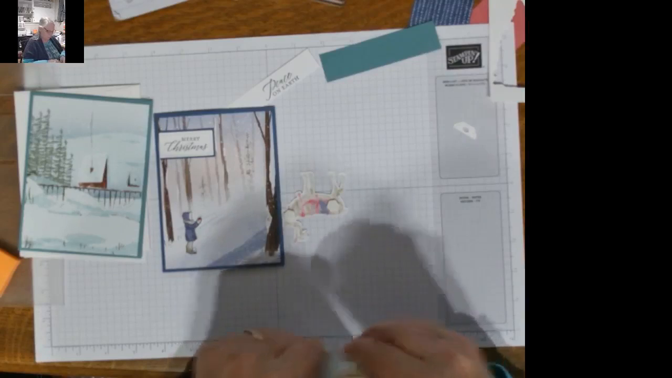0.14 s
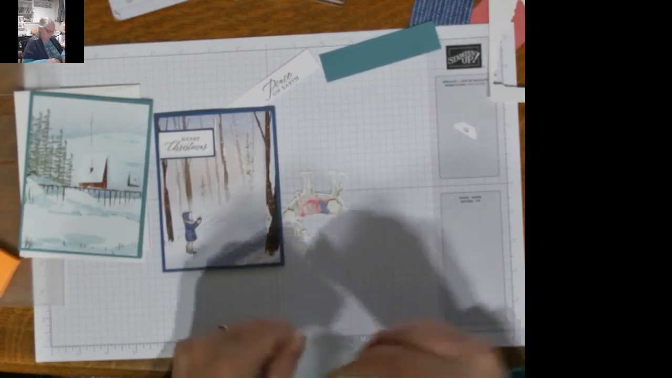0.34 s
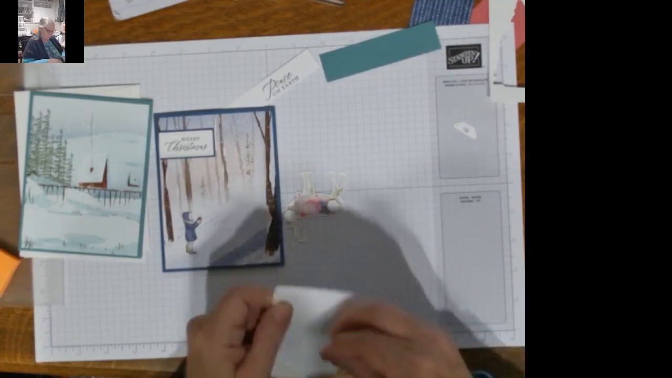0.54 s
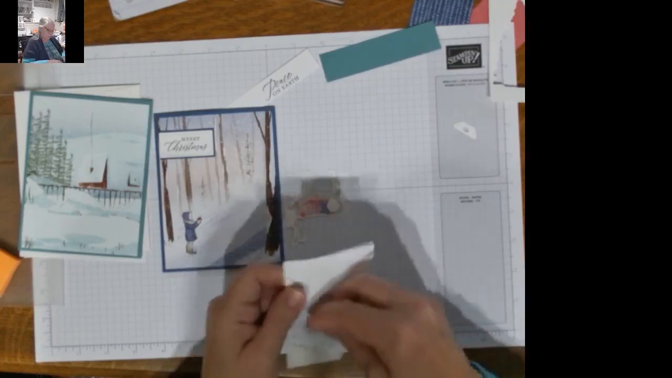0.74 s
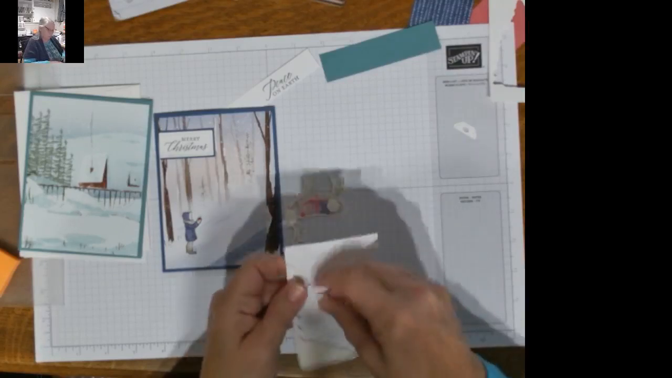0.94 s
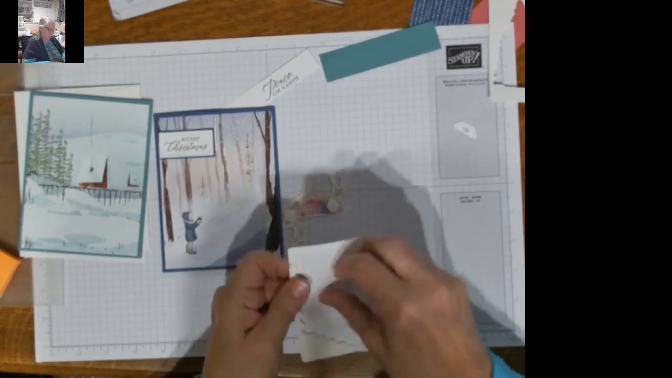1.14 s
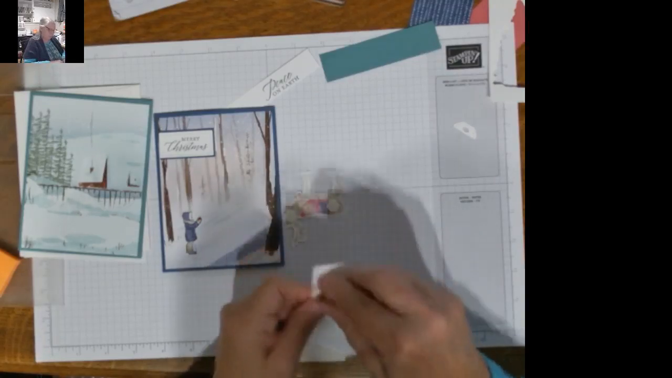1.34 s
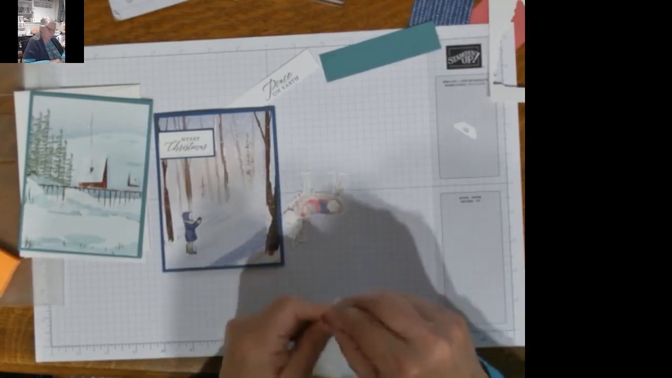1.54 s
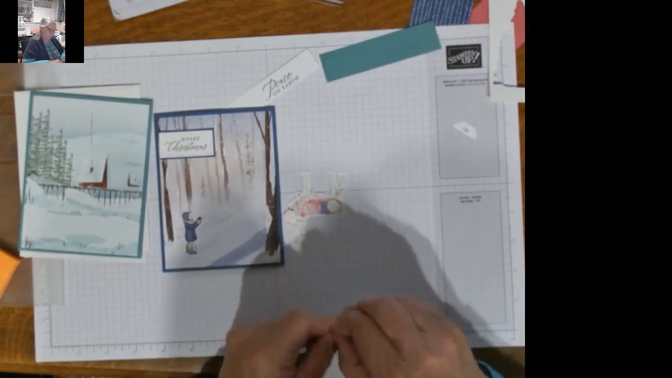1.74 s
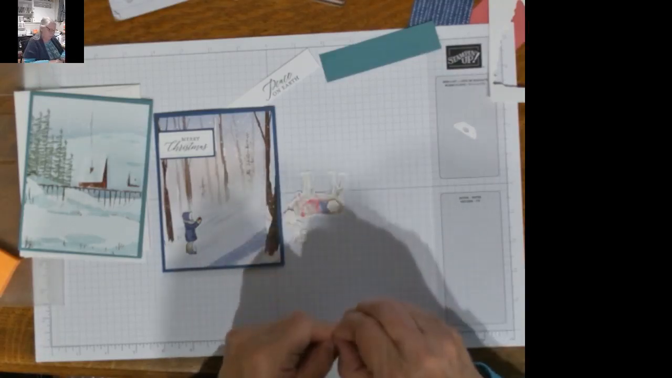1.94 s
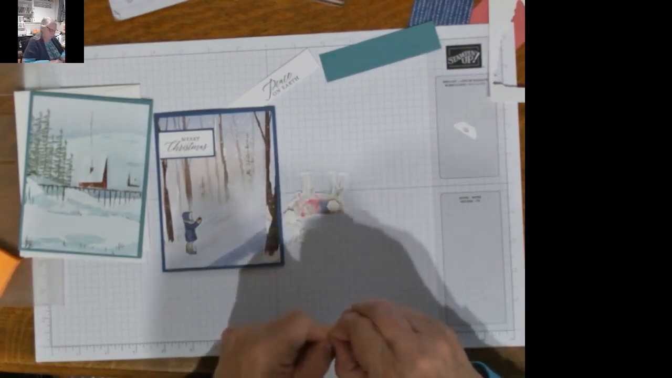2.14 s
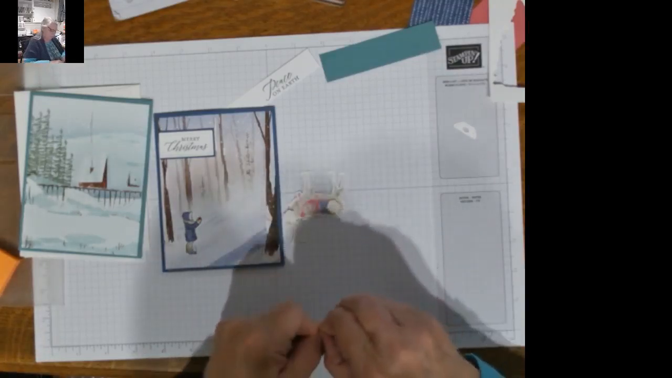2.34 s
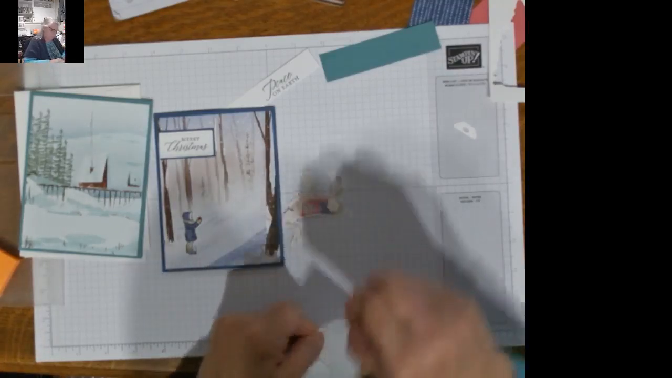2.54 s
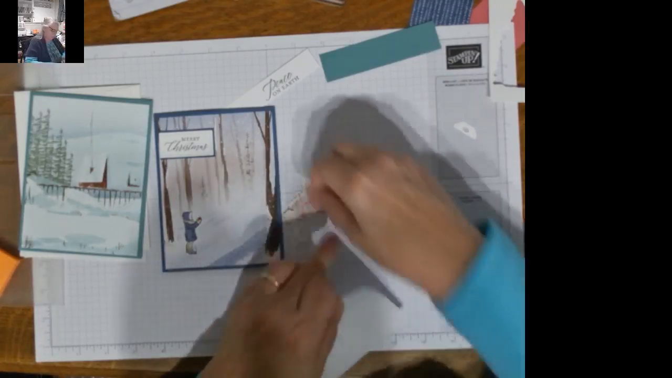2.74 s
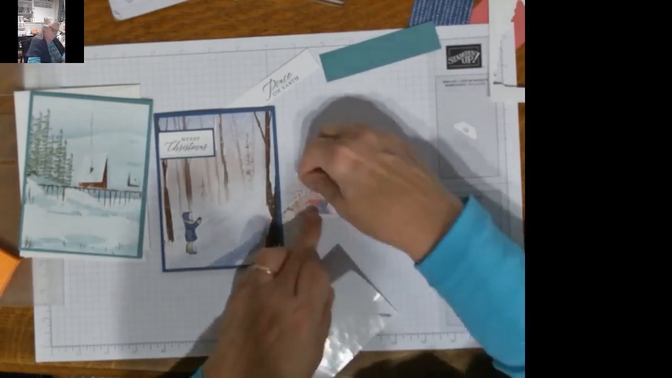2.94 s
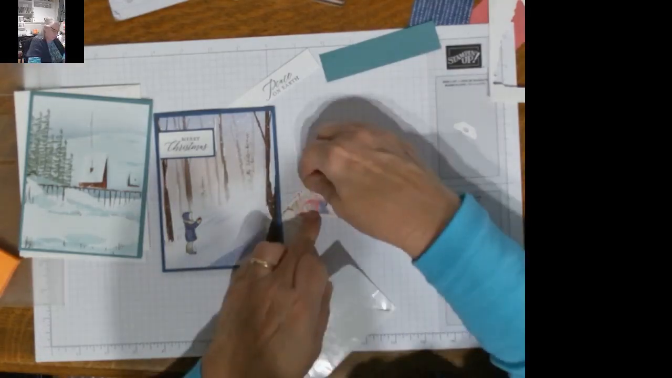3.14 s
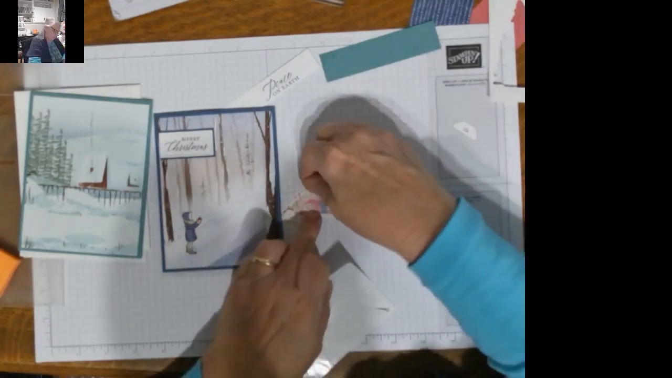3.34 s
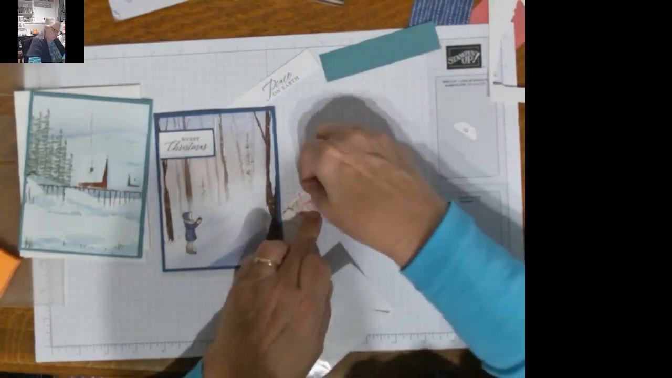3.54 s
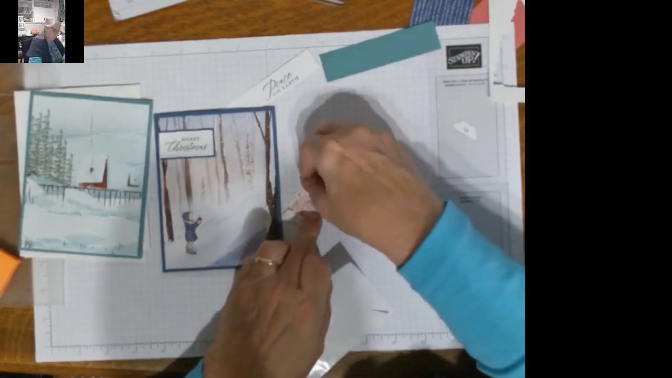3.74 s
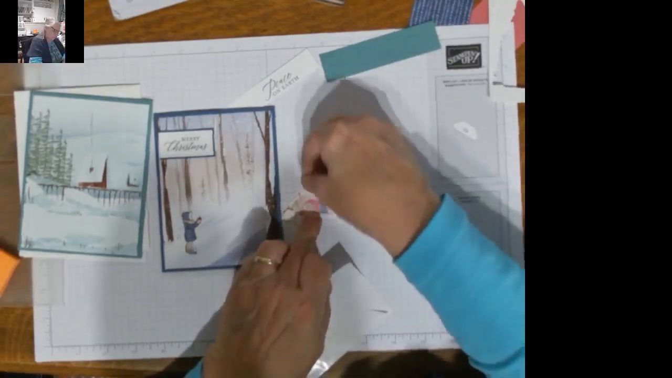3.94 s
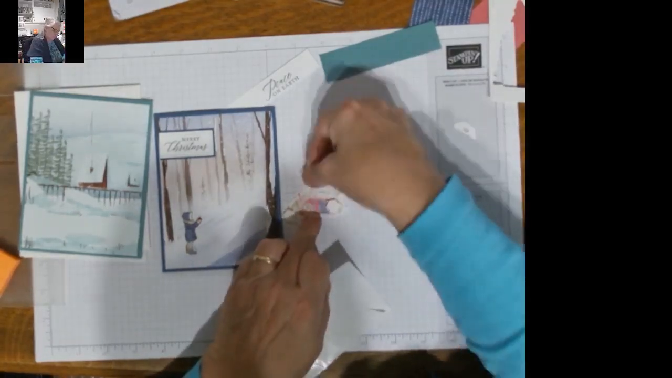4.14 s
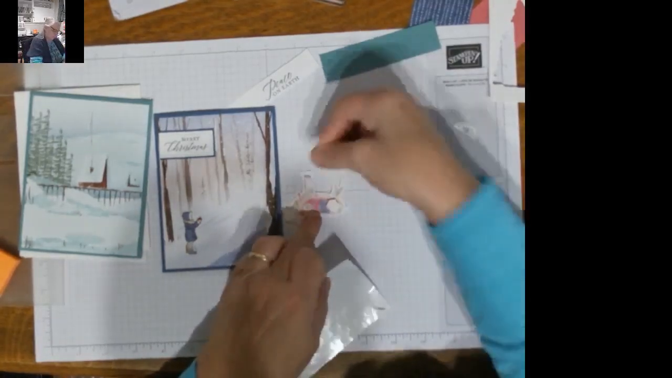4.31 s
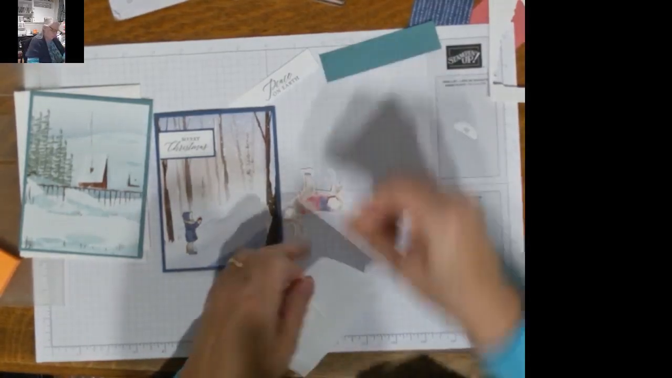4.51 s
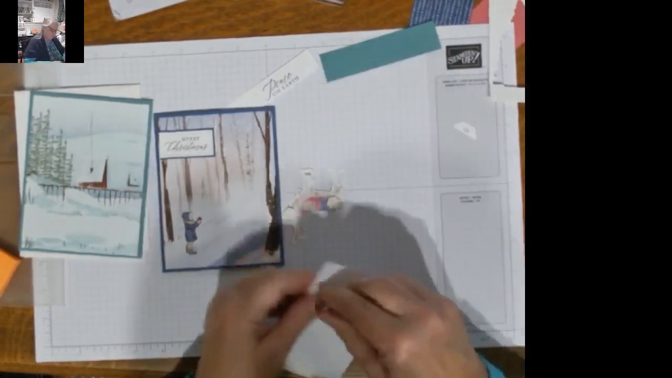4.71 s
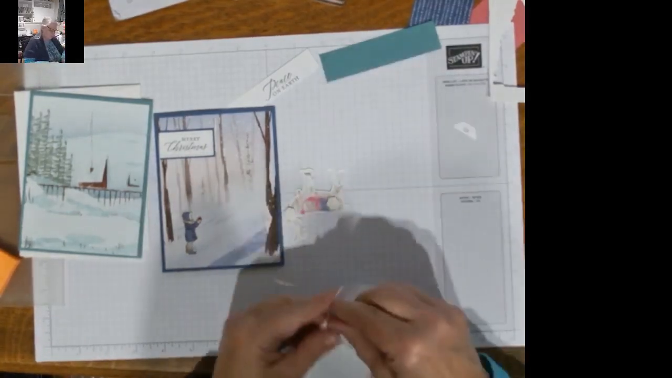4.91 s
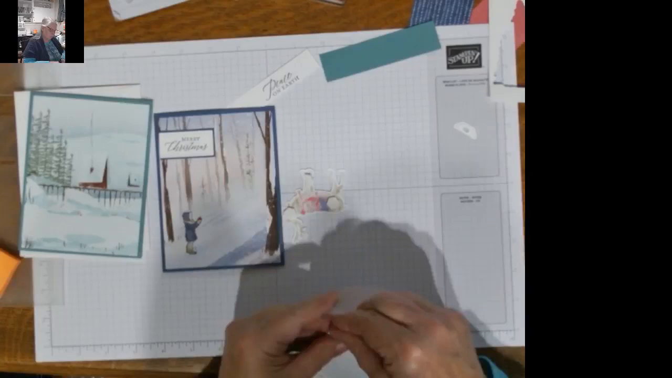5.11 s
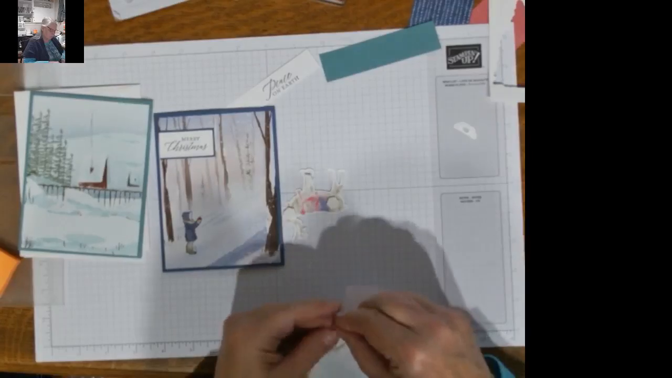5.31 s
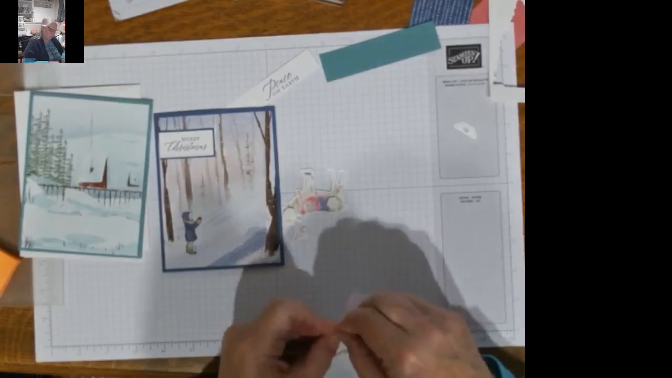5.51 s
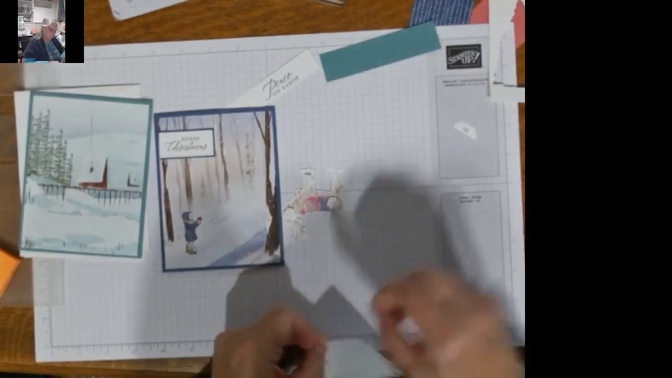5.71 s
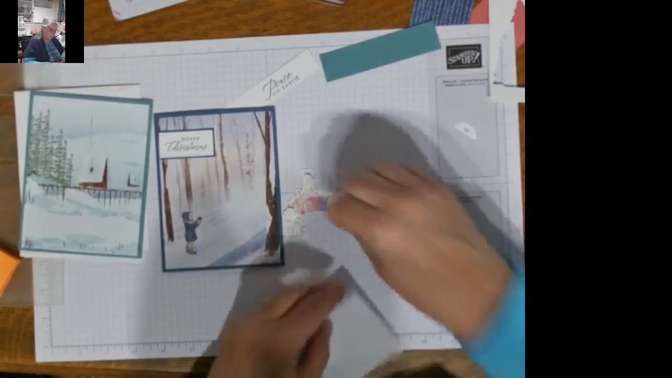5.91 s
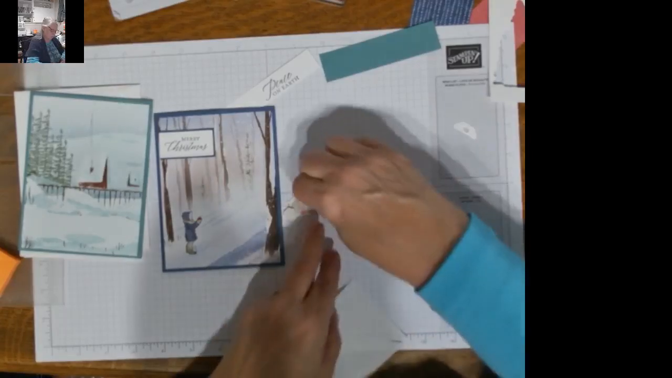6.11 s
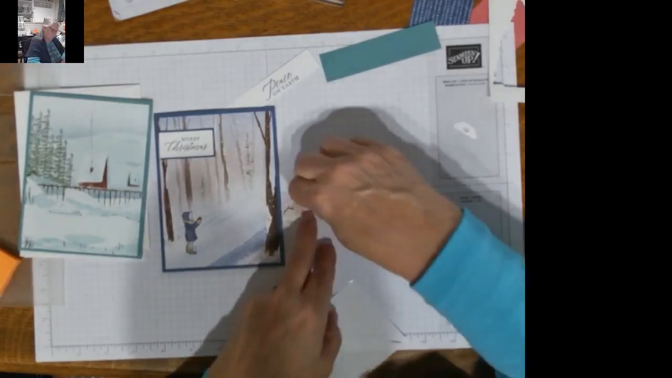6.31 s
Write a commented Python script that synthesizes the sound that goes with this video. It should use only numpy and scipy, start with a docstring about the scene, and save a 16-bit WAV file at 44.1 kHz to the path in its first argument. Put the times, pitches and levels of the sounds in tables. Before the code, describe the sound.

Fingers work small foam adhesive dots off their stiff liner. Crisp cracks, duller flap slaps and dry sliding rustles come in irregular bursts, with tiny nail clicks and short peeling fizzes. Between bursts, pressing onto paper is almost inaudible. Hands softly thump the hollow desk. The microphone is fairly near, the room small with a short echo, faint hiss and ventilation drone.

```python
"""Adhesive dots on a paper cut-out

Foam adhesive dots are picked off their stiff backing sheet and pressed onto paper on a desk.
The sheet buckles in sharp noise bursts; rubbing and peeling fingers are hiss, catches and creases,
all coloured by the paper's modes. Hands bump and knock the desk: low sways and hollow resonances.
A small room echoes the paper, over faint hiss, a ventilation drone and mains hum."""
import sys
import numpy as np
from scipy import signal
from scipy.fft import rfft, irfft, next_fast_len
from scipy.io import wavfile
from scipy.ndimage import uniform_filter1d

SR = 44100
rng = np.random.default_rng(int(sys.argv[2]) if len(sys.argv) > 2 else 0)


def pcm_store(signal):
    """Save signal as 16-bit PCM."""
    levels = np.round(np.clip(np.atleast_2d(signal), -1, 1) * 32767)
    wavfile.write(sys.argv[1], SR, levels.astype(np.int16).T)


N = 280476


def gain_of(db):
    """Decibels to amplitude."""
    return 10 ** (np.asarray(db) / 20)


def evened(x):
    """Scales to rms 1."""
    return x / np.sqrt(np.mean(x ** 2) + 1e-20)


def read(points, hz, axis=1):
    """Interpolates one table column on a log-frequency axis."""
    table = np.transpose(points)
    return np.interp(np.log(hz + 1), np.log(table[0] + 1), table[axis])


def add(mix, start_s, sound):
    """Mixes a sound in at start_s, clipped to the mix."""
    start = round(start_s * SR)
    sound = sound[max(-start, 0):]
    part = mix[max(start, 0):][:len(sound)]
    part += sound[:len(part)]


# Still-room hiss spectrum: (frequency [Hz], relative density [dB per Hz])
HISS_SPECTRUM = [(25, -1), (55, -5.5), (90, -4.5), (160, -6.5), (250, -10.5), (500, -14.5), (1000, -20.5),
                 (2000, -21.5), (4000, -29), (8000, -33.5), (13000, -40), (16000, -39)]
# Mains hum: (frequency [Hz], level [dB rms])
MAINS_HUM = [(59.9, -76), (119.8, -59.5)]
HISS_ABOVE_200_HZ_DB = -70


def still_room(drone_hz=97, drone_width_hz=14, drone_db=-71):
    """Steady shaped hiss, a narrow noise band as the ventilation drone, and mains-hum sines."""
    hz = np.fft.rfftfreq(N, 1 / SR)
    t = np.arange(N) / SR
    spectrum = rfft(rng.standard_normal(N)) * gain_of(read(HISS_SPECTRUM, hz))
    hiss = irfft(spectrum, N) / irfft(spectrum * (hz > 200), N).std()
    drone_gain = 1 / (1 + (2 * (hz - drone_hz) / drone_width_hz) ** 2)
    drone = irfft(rfft(rng.standard_normal(N)) * drone_gain, N)
    hum = np.zeros(N)
    for hum_hz, db in MAINS_HUM:
        hum += gain_of(db) * evened(np.sin(2 * np.pi * (hum_hz * t + rng.random())))
    return gain_of(HISS_ABOVE_200_HZ_DB) * hiss + gain_of(drone_db) * evened(drone) + hum


# Room echo: (frequency [Hz], nominal level re direct sound [dB], t60 [s])
ROOM_ECHO = [(200, 12.5, 0.13), (443.4, 9.5, 0.2), (900, -2.5, 0.23), (1170, -6, .28), (2130, -6.5, 0.16),
             (4510, -12, 0.27), (8000, -10, 0.23), (14000, -4, 0.1)]


def room(x, first_s=.003, reflections_per_s=5000):
    """Random reflections from desk and near walls, each band decaying at its own rate."""
    t = np.arange(SR // 2) / SR
    taps = rng.standard_normal(len(t)) * (rng.random(len(t)) < reflections_per_s / SR)
    hz, when_s, z = signal.stft(evened(taps), SR, nperseg=256)
    t60_s = read(ROOM_ECHO, hz, axis=2)[:, None]
    unit_energy = np.sqrt(2 * np.log(1000) / (t60_s * SR))
    level = gain_of(read(ROOM_ECHO, hz)[:, None])
    decay = np.exp(-np.log(1000) * when_s / t60_s)
    tail = signal.istft(z * unit_energy * level * decay, SR, nperseg=256)[1][:len(t)]
    return signal.fftconvolve(x, tail * (t > first_s))[:N]


# Hands and arms bump the desk: (start [s], length [s], level [dB rms], pitch [Hz])
DESK_BUMPS = [(-.02, 0.1, -54.5, 88.7), (0.612, 0.11, -63.5, 95.3), (1.275, 0.099, -54.5, 88),
              (2.084, 0.26, -53, 56.2), (2.079, 0.17, -55.5, 29), (2.432, 0.099, -56.5, 55),
              (2.64, 0.072, -57, 92), (3.969, 0.058, -61, 86)]


def bumps(scuff_db=-14, scuff_hz=220):
    """Soft flesh pushes the desk top: a sine sway with low-passed scuff under a sin-squared envelope."""
    out = np.zeros(N)
    lowpass = signal.butter(2, scuff_hz, fs=SR, output="sos")
    for start_s, length_s, db, pitch_hz in DESK_BUMPS:
        t = np.arange(0, length_s, 1 / SR)
        scuff = signal.sosfilt(lowpass, rng.standard_normal(SR))[:len(t)]
        sway = evened(np.sin(2 * np.pi * pitch_hz * t)) + gain_of(scuff_db) * evened(scuff)
        add(out, start_s, gain_of(db) * evened(sway * np.sin(np.pi * t / length_s) ** 2))
    return out


# The hardest tugs knock the hands on the desk: (start [s], rms level before envelope [dB])
DESK_KNOCKS = [(0.937, -50.5), (1.511, -44), (2.442, -53), (5.689, -40)]
# Desk modes: (frequency [Hz], half-amplitude width [Hz], relative level [dB])
DESK_MODES = [(307, 45, -3), (415, 65, 5), (570, 150, -2)]


def knocks(rise_s=.008, decay_s=.028):
    """The desk modes answer as random-phase resonances with a soft rise and short decay."""
    out = np.zeros(N)
    t = np.arange(SR // 5) / SR
    hz = np.fft.rfftfreq(len(t), 1 / SR)
    top = sum(gain_of(db) / (1 + (2 * (hz - f) / width) ** 2) for f, width, db in DESK_MODES)
    envelope = (1 - np.exp(-t / rise_s)) * np.exp(-t / decay_s)
    for start_s, db in DESK_KNOCKS:
        phase = np.exp(2j * np.pi * rng.random(len(hz)))
        ringing = evened(irfft(top * phase, len(t)))
        add(out, start_s, gain_of(db) * ringing * envelope)
    return out


def causal(gain):
    """Minimum-phase response with this gain: it rings only after the blow."""
    log_gain = np.log(np.maximum(gain, gain.max() * gain_of(-100)))
    circle = np.concatenate([log_gain, log_gain[-2:0:-1]])
    return np.exp(np.conj(signal.hilbert(circle)))[:len(gain)]


# Radiation of handled paper: (frequency [Hz], relative level [dB])
PAPER_RADIATION = [(700, -4), (1500, -3), (3200, 2.5), (4200, 4), (5300, 2.5), (7000, 0.5), (8500, 1),
                   (10000, -1), (13000, 5), (16000, 3)]
# Bending modes of the backing sheet: (frequency [Hz], width at half the dB lift [Hz], lift [dB])
SHEET_MODES = [(1103, 220, 6), (1420, 80, 0.5), (1950, 46, 3.5), (2076, 90, 4), (2520, 110, 4),
               (2861, 90, 2.5), (3450, 180, 2.5), (5200, 830, 3)]
# Body, edge and air bands: (low [Hz], high [Hz])
LEVEL_BANDS = [(700, 2800), (2800, 9000), (9000, 16000)]


def sheet(force, span_s, band_db, lowest_hz, leak_db, holder_db, ring_hz=1, ring_db=0,
          sharpness=8, droop=0.28, holder_hz=900):
    """A force radiates through a paper patch: weak bass, modes, a ring, set body, edge and air levels."""
    size = 2 * next_fast_len(len(force) // 2 + 1024)
    hz = np.fft.rfftfreq(size, 1 / SR) + 1
    spectrum = rfft(force, size)
    # the patch hardly radiates below its lowest mode; the sheet around it and the desk reach further down
    patch = 1 / np.sqrt(1 + (lowest_hz / hz) ** 9)
    holder = gain_of(holder_db) / np.sqrt(1 + (holder_hz / hz) ** 10)
    bass_cut = patch + holder + gain_of(leak_db) * hz / (hz + 250)
    modes_db = sum(db / (1 + (2 * (hz - f) / width) ** 2) for f, width, db in SHEET_MODES)
    detuning = sharpness * (hz / ring_hz - ring_hz / hz)
    ringing = 1 + (gain_of(ring_db) - 1) / np.sqrt(1 + detuning ** 2)
    # a soft contact keeps losing treble towards the top
    top_db = droop * min(band_db[2] - band_db[1], 0) * np.log2(np.maximum(hz / 7000, 1))
    colour = gain_of(read(PAPER_RADIATION, hz) + modes_db + top_db) * bass_cut * ringing
    log_centres = np.log([1930, 4070, 6800, 10800])
    for _ in range(2):  # bands overlap: second pass refines
        power = 2 * abs(spectrum * colour) ** 2 / (size * span_s * SR)
        body, edge, air = (db - 10 * np.log10(power[(hz > lo) & (hz < hi)].sum())
                           for db, (lo, hi) in zip(band_db, LEVEL_BANDS))
        colour = colour * gain_of(np.interp(np.log(hz), log_centres, [body, edge, edge, air]))
    return irfft(spectrum * causal(colour), size)


def flexing(force, patchy_db=7.0):
    """The grip bends the paper, so small patches of its spectrum swell and fade."""
    z = signal.stft(force, nperseg=384)[2]
    patches = uniform_filter1d(rng.standard_normal(z.shape), size=16, axis=1)
    patches = uniform_filter1d(patches, size=2, axis=0)
    return signal.istft(z * gain_of(patchy_db * evened(patches)), nperseg=384)[1][:len(force)]


def resonate(x, hz, width_hz):
    """A one-pole resonance of peak gain 1 whose pitch may glide."""
    turn = np.exp(2j * np.pi * np.cumsum(hz * np.ones(len(x))) / SR)
    r = np.exp(-np.pi * width_hz / SR)
    return 2 * (turn * signal.lfilter([1 - r], [1, -r], x / turn)).real


def friction(speed, contact, ring_hz, ring_width=0.1, catches_per_s=900, catch_db=1.5, slide=0.91,
             unevenness_db=2.0, creases_per_s=80, crease_db=29):
    """Skin slides on paper: hiss, catching fibres and glue, tiny creases, under uneven pressure."""
    body_db, air_db, lowest_hz, ring_db = contact
    hiss, drift, size, chance, creasing = rng.random((len(speed), 5)).T
    catch_size = gain_of(catch_db * np.minimum(-np.log(size), 4))
    catches = np.sign(hiss - .5) * catch_size * (chance < catches_per_s / SR)
    creases = gain_of(crease_db) * (2 * hiss - 1) * (creasing < creases_per_s / SR)
    pressure = gain_of(unevenness_db * evened(uniform_filter1d(drift - .5, size=300)))
    rubbing = flexing(slide * evened(hiss - .5) + evened(catches))
    force = (rubbing + creases) * pressure * speed
    ringing = resonate(force, ring_hz, ring_width * np.mean(ring_hz))
    force = force + (gain_of(ring_db) - 1) * ringing
    edge_db = 10 * np.log10(np.mean(speed ** 2))
    band_db = edge_db + body_db, edge_db, edge_db + air_db
    return sheet(force, len(speed) / SR, band_db, lowest_hz, leak_db=-27.5, holder_db=-17.0)


# Contact colours: (body re edge [dB], air re edge [dB], lowest frequency [Hz], ring lift [dB])
SLIDE_CONTACT = (-16, -5.5, 2299.5, 15)
BEND_CONTACT = (-4, -10, 1137, 0.5)
PICK_CONTACT = (1.5, -13.5, 1602.5, 8.5)
WIPE_CONTACT = (-11.5, -16.5, 1695.5, 13.5)
# Fingers slide on the glossy sheet, ring moving with the grip:
# (time [s], edge level before trim [dB], ring [Hz])
SLIDE_MOVE = [(.27, -70, 5600), (.35, -62, 8370), (.40, -48.5, 8530), (.47, -55.5, 6495), (.54, -57, 6800),
              (.58, -43, 7100), (.61, -63.5, 6995), (.70, -61, 6700), (.75, -52.5, 5985), (.86, -59, 6070),
              (.935, -47.5, 7590)]
# Fingers bend the sheet to lift a dot: (time [s], edge level before trim [dB], ring [Hz])
BEND_MOVE = [(.97, -58.5, 6000), (1.09, -52, 3070), (1.12, -38, 2590), (1.16, -63.5, 3520),
             (1.185, -45.5, 5200), (1.24, -44, 5300), (1.27, -58.5, 4900), (1.49, -69, 1903)]
# Nails pick at the dot's liner: (time [s], edge level before trim [dB], ring [Hz])
PICK_MOVE = [(4.55, -63.5, 2700), (4.66, -63, 2400), (4.75, -47, 2100), (4.85, -61, 1900),
             (5.07, -55.5, 1960), (5.18, -66, 2000), (5.27, -68.5, 2000), (5.31, -58.5, 1950),
             (5.42, -59.5, 2150), (5.45, -70.5, 2050), (5.58, -78.5, 2000)]
IDLE_BEFORE_TRIM_DB, IDLE_RING_HZ, IDLE_SWELL_DB = -81.5, 4200, 3.5


def handling():
    """Long moves: friction follows the fingers' effort, over a faint idle rustle that swells at random."""
    swell = np.interp(np.arange(N), np.linspace(0, N, num=60), rng.standard_normal(size=60))
    idle = gain_of(IDLE_BEFORE_TRIM_DB + IDLE_SWELL_DB * swell)
    out = friction(idle, WIPE_CONTACT, IDLE_RING_HZ)[:N]
    for move, contact in [(SLIDE_MOVE, SLIDE_CONTACT), (BEND_MOVE, BEND_CONTACT), (PICK_MOVE, PICK_CONTACT)]:
        when_s, db, ring_hz = np.transpose(move)
        t = np.arange(when_s[0], when_s[-1], 1 / SR)
        effort = gain_of(np.interp(t, when_s, db))
        add(out, when_s[0], friction(effort, contact, np.interp(t, when_s, ring_hz)))
    return out


# Contact colours: (body re edge [dB], air re edge [dB], lowest frequency [Hz], ring lift [dB])
PEEL_CONTACT = (-12, -3.5, 1701, 7)
SCRAPE_CONTACT = (-0.5, -14, 1198, 7)
# A fingertip wipes or presses paper:
# (half-speed time [s], length scale [s], full-speed edge level before trim [dB], ring [Hz])
WIPE_STROKES = [(2.861, .07, -62, 4260), (2.98, 0.086, -71, 5350), (3.078, 0.077, -68, 4630),
                (3.452, 0.11, -69, 4770), (4.18, 0.15, -68.5, 3350), (4.314, 0.064, -52, 3330),
                (4.392, 0.088, -63.5, 3120), (4.892, .036, -48.5, 5700), (4.986, 0.085, -48, 5500),
                (5.2, 0.11, -60, 6040), (5.968, .11, -60, 3020)]
# Glue lets go with a short fizz:
# (half-speed time [s], length scale [s], full-speed edge level before trim [dB], ring [Hz])
PEEL_STROKES = [(0.015, 0.093, -69.5, 14000), (0.338, 0.069, -58.5, 8400), (2.382, 0.029, -41, 3210),
                (2.625, 0.071, -62.5, 5100), (3.38, 0.093, -64, 5600), (4.144, .03, -51.5, 4200),
                (5.588, .02, -50, 5500), (6.226, 0.033, -59.5, 5225), (6.317, .014, -53, 6280)]
# A paper edge scrapes past a finger:
# (half-speed time [s], length scale [s], full-speed edge level before trim [dB], ring [Hz])
SCRAPE_STROKES = [(0.703, 0.021, -52.5, 6750), (0.73, 0.071, -63.5, 6060), (1.375, 0.029, -50.5, 2870),
                  (1.627, 0.095, -68.5, 2040), (2.441, 0.037, -41, 1950), (2.527, .034, -52, 3830),
                  (5.631, 0.027, -43.5, 2540), (5.817, 0.054, -49.5, 2050), (5.91, 0.076, -60.5, 2970)]


def strokes(attack=.45, release=0.49, hold=.7):
    """Short wipes, peels and scrapes: speed rises, holds, eases off (shares of the length scale)."""
    out = np.zeros(N)
    for table, contact in [(WIPE_STROKES, WIPE_CONTACT), (PEEL_STROKES, PEEL_CONTACT),
                           (SCRAPE_STROKES, SCRAPE_CONTACT)]:
        for start_s, length_s, db, ring_hz in table:
            progress = np.arange(-attack / 2, 2, 1 / (length_s * SR))
            rise = np.minimum(progress / attack + .5, 1)
            speed = rise * np.exp(-np.maximum(progress - hold, 0) / release)
            add(out, start_s + progress[0] * length_s, friction(gain_of(db) * speed, contact, ring_hz))
    return out


SNAP_SPAN_S = .005  # snap levels: energy spread over this time


def snap(peak_s, build_s, decay_s, band_db, lowest_hz, ring_hz, ring_db, flutter=0.38, chatter_db=3,
         roundness=0.99, after_db=-24, after_s=0.005, before_db=-28, before_s=0.0032):
    """The sheet buckles: tiny slips build up to one impulse, and bending waves flutter out."""
    t = np.arange(-SR // 50, SR // 25) / SR
    slips, sizes = rng.standard_normal((2, len(t)))
    burst = np.exp(-(abs(t) / np.where(t < 0, build_s, decay_s)) ** roundness)
    # fibres creak before giving way and settle afterwards
    creak = gain_of(before_db) * np.exp(-abs(t) / before_s)
    settling = gain_of(after_db) * np.exp(-abs(t) / after_s)
    envelope = burst + np.where(t < 0, creak, settling)
    force = flutter * envelope * evened(slips * gain_of(chatter_db * sizes))
    force[t == 0] = 1
    sound = sheet(force, SNAP_SPAN_S, band_db, lowest_hz, leak_db=-22.5, holder_db=-15,
                  ring_hz=ring_hz, ring_db=ring_db)
    return peak_s + t[0], sound


# Stiff sheet buckles sharply: (peak time [s], decay [s], body [dB], edge [dB], air [dB], ring [Hz])
SHEET_CRACKS = [(0.1294, 0.0057, -29, -23.5, -30.5, 6200), (0.5858, 0.0027, -36.5, -28.5, -34.5, 6900),
                (0.9378, 0.002, -18, -18.5, -31, 2080), (1.078, 0.00054, -32, -27, -32, 3090),
                (2.4111, 0.00259, -34.5, -24, -33, 5350), (4.0042, 0.00073, -45, -32.5, -29.5, 3450),
                (4.7746, 0.00084, -23, -19, -38, 5270), (5.633, 0.003, -50, -32, -36, 5600)]
CRACK_BUILD_PER_DECAY, CRACK_LOWEST_HZ, CRACK_RING_DB = 0.1, 1240, 8
# Loose flap springs back, duller:
# (peak time [s], build-up [s], decay [s], body [dB], edge re body [dB], ring [Hz])
FLAP_SLAPS = [(0.111, 0.0009, 0.0043, -34, -5, 1420), (1.0539, 0.000264, .0034, -32, -3, 1350),
              (1.197, .0005, .004, -40.5, -18, 1490), (1.5052, 0.0001, 0.0024, -19.5, -11, 2130),
              (1.521, 0.0058, .0062, -20, -8, 2276), (2.43, 0.0012, 0.0017, -25, -2.5, 2080),
              (4.563, 0.00057, 0.005, -51.5, -8, 2020), (4.767, 0.0035, 0.007, -36, -7, 2866),
              (5.672, 0.0013, 0.0034, -25, -19.5, 2530), (5.686, 0.0047, 0.003, -16, -2, 2750),
              (5.708, 0.0081, 0.0087, -25.5, -5.5, 2800), (5.81, 0.00067, .006, -44.5, -0.5, 2400),
              (6.285, 0.0019, 0.0035, -43, -27.5, 2070)]
FLAP_AIR_RE_EDGE_DB, FLAP_LOWEST_HZ, FLAP_RING_DB = -22.5, 1150, 12
# Fingernail flicks a dot's edge: (peak time [s], edge [dB], air re edge [dB], ring [Hz])
NAIL_TICKS = [(0.7573, -43, 1, 6600), (0.816, -49.5, -6.5, 6170), (2.639, -52.5, -10, 4900),
              (2.9972, -56.5, -6, 5343), (3.4421, -52, -4, 5090), (4.392, -41, -32, 3350),
              (4.675, -40, -17, 6500), (4.9507, -50.5, -4, 4030), (5.606, -40, 1.5, 5600),
              (5.9417, -47, -18, 3450)]
TICK_BUILD_S, TICK_DECAY_S = 0.00036, 0.0028
TICK_BODY_RE_EDGE_DB, TICK_LOWEST_HZ, TICK_RING_DB = -11, 1200, 11


def snaps(ring_share):
    """Sharp cracks, dull flaps, thin nail ticks: one snap mechanism on different paper patches."""
    out = np.zeros(N)
    for peak_s, decay_s, body, edge, air, ring_hz in SHEET_CRACKS:
        build_s = CRACK_BUILD_PER_DECAY * decay_s
        ring_db = ring_share * CRACK_RING_DB
        add(out, *snap(peak_s, build_s, decay_s, (body, edge, air), CRACK_LOWEST_HZ, ring_hz, ring_db))
    for peak_s, build_s, decay_s, body, edge_re_body, ring_hz in FLAP_SLAPS:
        edge = body + edge_re_body
        band_db = body, edge, edge + FLAP_AIR_RE_EDGE_DB
        ring_db = ring_share * FLAP_RING_DB
        add(out, *snap(peak_s, build_s, decay_s, band_db, FLAP_LOWEST_HZ, ring_hz, ring_db))
    for peak_s, edge, air_re_edge, ring_hz in NAIL_TICKS:
        band_db = edge + TICK_BODY_RE_EDGE_DB, edge, edge + air_re_edge
        ring_db = ring_share * TICK_RING_DB
        add(out, *snap(peak_s, TICK_BUILD_S, TICK_DECAY_S, band_db, TICK_LOWEST_HZ, ring_hz, ring_db))
    return out


def scene(stroke_trim_db=-.5, handling_trim_db=-1, sideways=.85):
    """Paper and desk in the room; snaps send a different, less ringing wave to the walls than upward."""
    upward = snaps(ring_share=1)
    outward = snaps(ring_share=0.2)
    rubbing = gain_of(stroke_trim_db) * strokes() + gain_of(handling_trim_db) * handling()
    # sideways: share of snap energy that feeds the room from the outward wave
    echo = room(np.sqrt(1 - sideways) * upward + rubbing) + room(np.sqrt(sideways) * outward)
    return (still_room() + bumps() + knocks() + rubbing + upward + echo)[None]


def record(dry, cutoff_hz=16000):
    """Limits the band with a linear-phase low-pass."""
    lowpass = signal.firwin(301, cutoff_hz, window=("kaiser", 9), fs=SR)
    return signal.oaconvolve(dry, lowpass[None], "same")


dry = scene()
out = record(dry)
pcm_store(out)
```